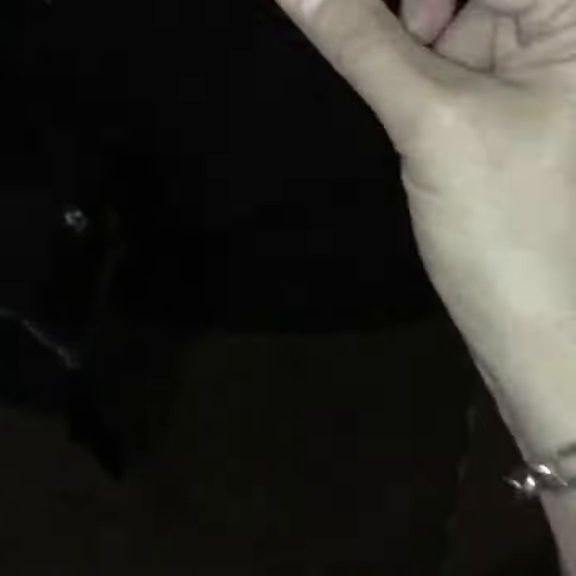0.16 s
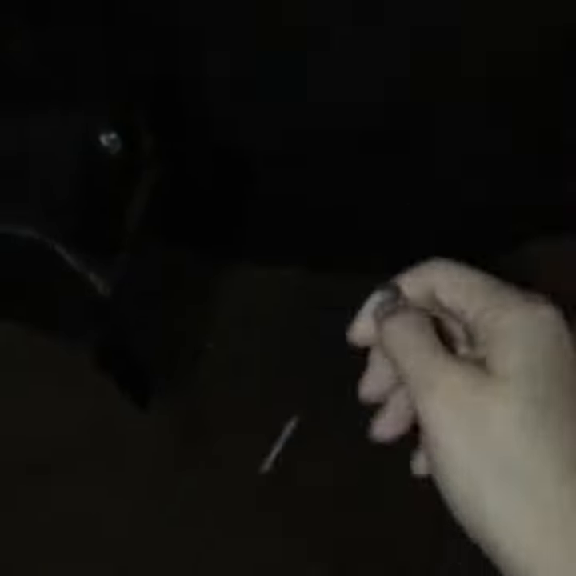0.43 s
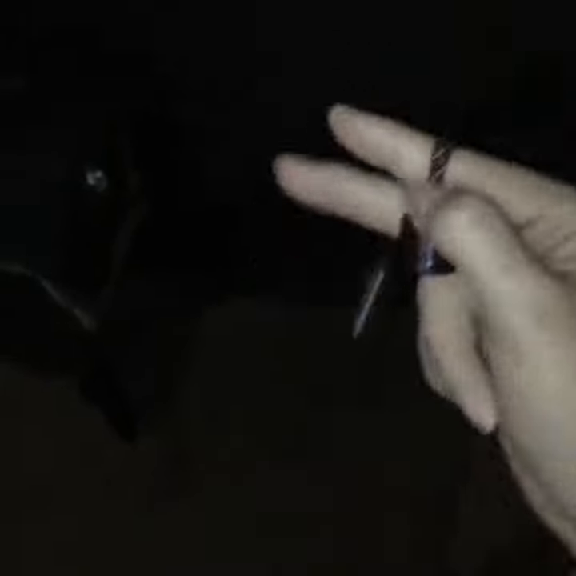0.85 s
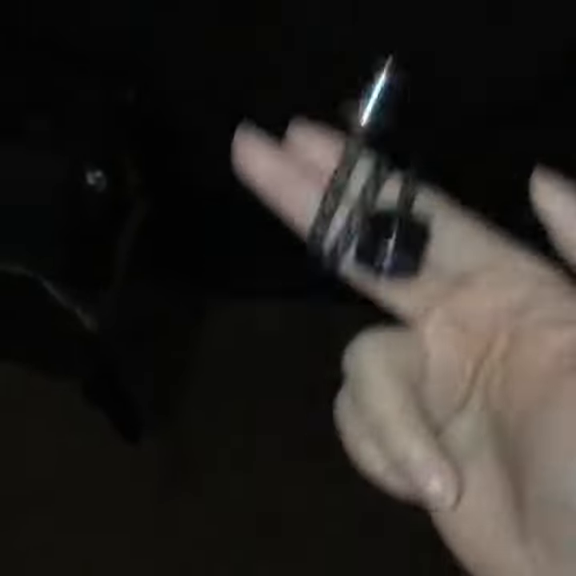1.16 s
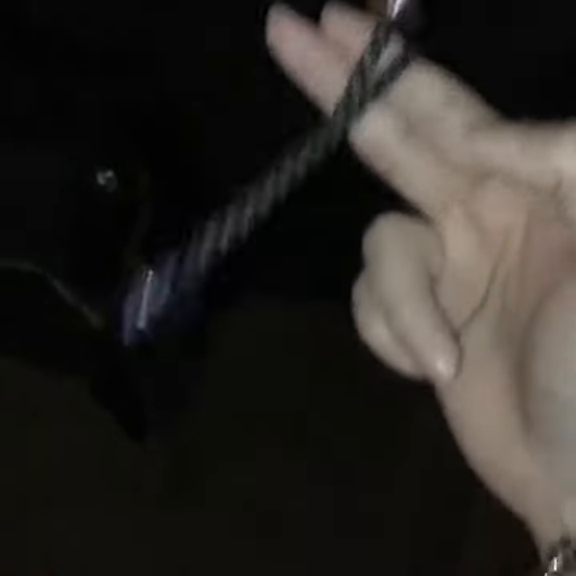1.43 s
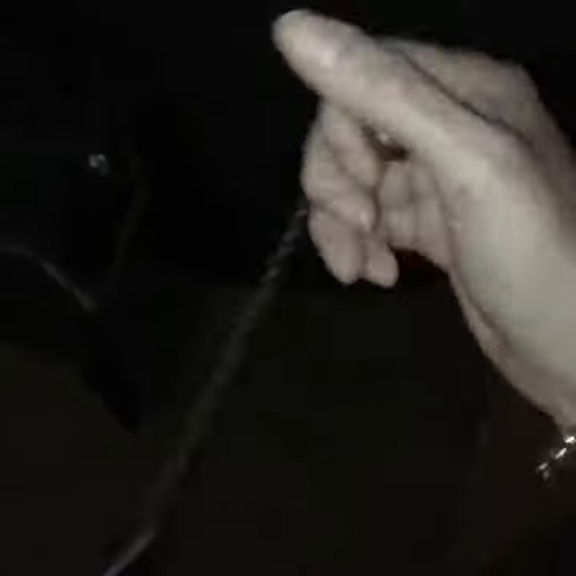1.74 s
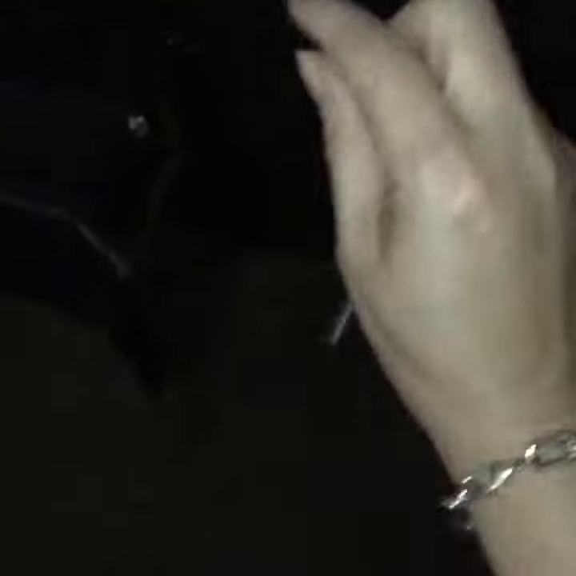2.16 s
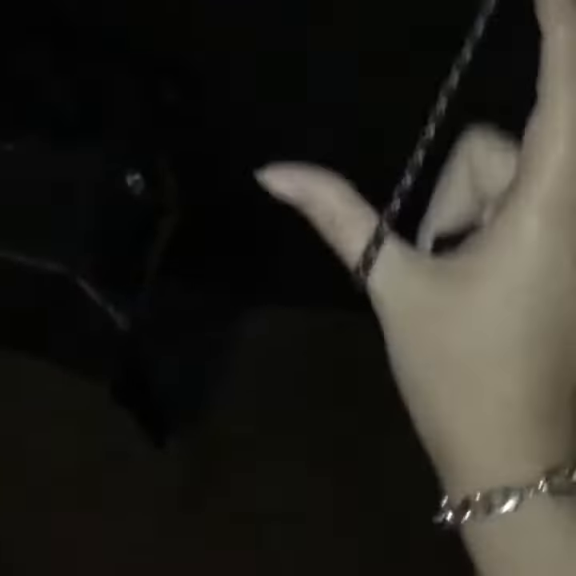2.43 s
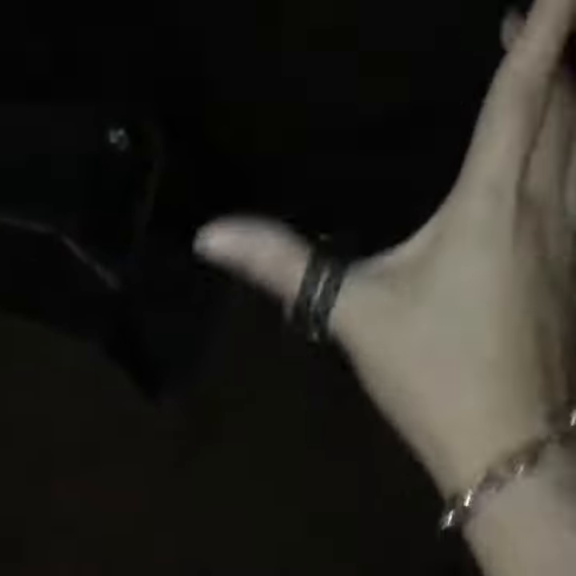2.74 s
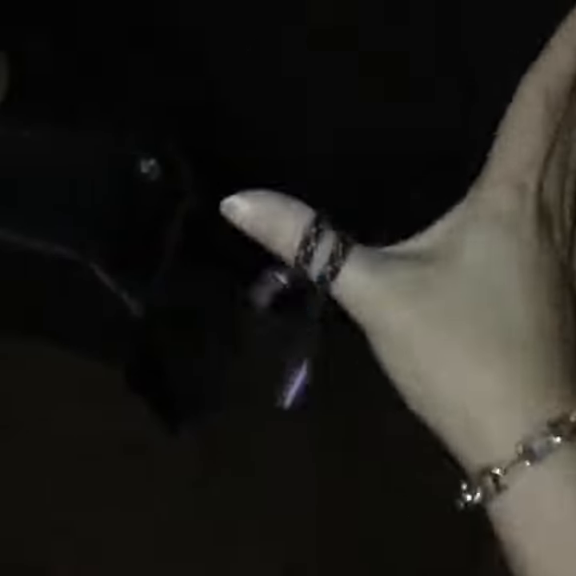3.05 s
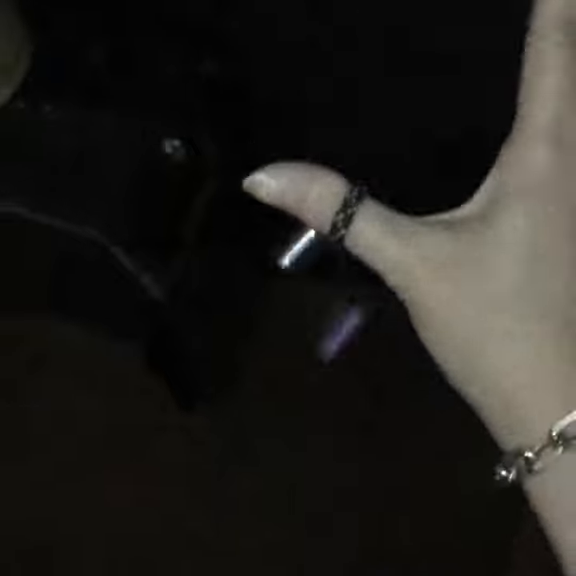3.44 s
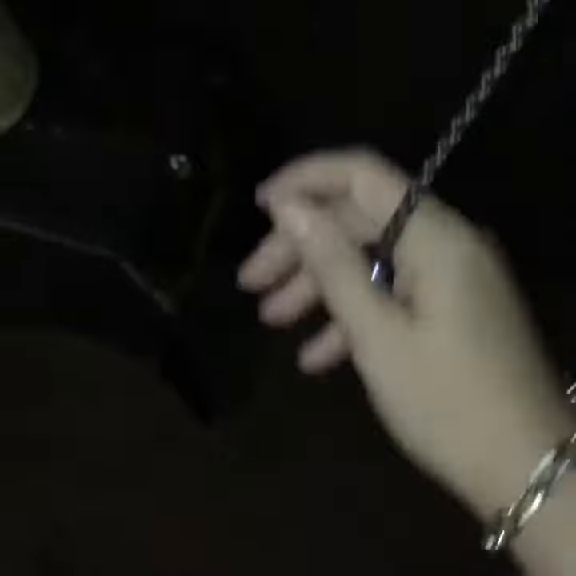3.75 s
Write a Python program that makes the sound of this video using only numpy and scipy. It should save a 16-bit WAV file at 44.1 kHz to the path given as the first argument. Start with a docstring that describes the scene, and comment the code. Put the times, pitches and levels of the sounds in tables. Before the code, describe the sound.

Close up in a small room, beads on a cord click thinly around a hand, with one hard clack early on. Faint cord swishes and wrist chain tinkles continue between ticks, over a fan's steady rush, hum and whine.

```python
"""Beads swung on a cord

Two weighted beads on a cord swing round the fingers, close by, in a small room. The cord
brushes over the skin and zips faintly as it winds on, a wrist chain tinkling along. The beads
tick lightly as they are caught; once they meet squarely in a sharp clack.
Behind, a fan-like machine runs steadily: rushing air, motor hum and a thin whine."""
import sys
import numpy as np
from scipy import signal
from scipy.fft import rfft, irfft
from scipy.io import wavfile

SR = 44100
rng = np.random.default_rng(int(sys.argv[2]) if len(sys.argv) > 2 else 0)


def digitize_waveform(pressure):
    """Quantize a signal to 16-bit integers and store it at the path in sys.argv[1].

    Rows of a 2-D input are taken as channels; values are limited to [-1, 1].
    """
    field = np.atleast_2d(pressure).T
    bounded = np.clip(field, -1, 1)
    quanta = np.round(bounded * 32767).astype(np.int16)
    wavfile.write(sys.argv[1], SR, quanta)


N = 171549
T = np.arange(N) / SR
HZ = np.maximum(np.arange(N // 2 + 1) * SR / N, 1)


def from_db(db):
    """Decibels to gain."""
    return 10 ** (np.asarray(db) / 20)


def unit_rms(x):
    """Scale to unit power."""
    return x / np.sqrt(np.mean(x ** 2) + 1e-20)


def cut(x, hz, kind, order=2):
    """Butterworth filter."""
    return signal.sosfilt(signal.butter(order, np.clip(hz, 10, .45 * SR), kind, fs=SR, output="sos"), x)


def drift(rate_hz):
    """Smooth random wander, unit RMS."""
    pole = np.exp(-80 * np.pi * rate_hz / SR)
    slow = signal.lfilter([1], [1, -2 * pole, pole * pole], rng.standard_normal(N // 40 + 2002))[2000:]
    return np.interp(np.arange(N) / 40, np.arange(len(slow)), unit_rms(slow))


def spectrum_db(points):
    """Levels interpolated over log frequency."""
    hz, db = np.transpose(points)
    return np.interp(np.log(HZ), np.log(hz), db)


def impulses(hits):
    """One click per (time [s], level [dB])."""
    clicks = np.zeros(N)
    for s, db in hits:
        clicks[int(s * SR)] += from_db(db)
    return clicks


def strike(hits, modes, low_hz, order=2):
    """Each hit rings the same heavily damped modes; little radiates below low_hz."""
    t = T[:SR // 50]
    ring = sum((-1) ** k * from_db(db - 60 * t / t60_s) * np.sin(2 * np.pi * hz * t)
               for k, (hz, db, t60_s) in enumerate(modes))
    ring = cut(ring, low_hz, "high", order)
    return signal.oaconvolve(impulses(hits), ring / np.abs(ring).max())[:N]


# Air rush: (frequency [Hz], density [dB/Hz])
AIR_SPECTRUM = [(25, -117), (43, -109), (56, -91.5), (72, -91.5), (90, -83), (120, -84.5), (155, -73),
                (210, -74), (300, -70), (400, -75.5), (520, -79.5), (690, -79), (750, -85.5), (1000, -86),
                (1350, -89.5), (2000, -90.5), (2250, -88), (2450, -93.5), (2650, -109), (3100, -112),
                (3500, -131), (4500, -133), (7000, -137), (10000, -136), (16000, -144)]
# Housing and room resonances: (centre [Hz], width [Hz], lift [dB])
AIR_RESONANCES = [(92.6, 2.7, 7.5), (244.2, 15, 5), (275, 16, 6), (334, 6.9, 6), (485, 5.7, 6.5),
                  (687, 5.2, 2.5), (2132, 79, 9.5), (2891, 81, 13.5), (4560, 240, 12), (9550, 300, 5)]
# Low rumble: (time [s], gain [dB])
RUMBLE_GAIN = [(0, 0.5), (.7, 1), (1.05, -0.5), (1.5, -0.5), (1.72, 3), (1.88, 4.5), (2.05, 0.5), (2.7, -1),
               (3.1, 1), (3.3, 1), (3.89, 0)]
# Flickering bands: (edge [Hz])
FLICKER_EDGES_HZ = [2020, 2450, 2960, 3540, 3770, 4200, 4750, 5340, 5800, 6000, 7000, 7835]


def fan_air(rumble_top_hz=426.5, flicker_rate_hz=23):
    """Air rushes through fixed resonances; the rumble swells a little and the treble flickers."""
    density_db = spectrum_db(AIR_SPECTRUM)
    for centre_hz, width_hz, lift_db in AIR_RESONANCES:
        density_db += lift_db * np.exp(-2 * ((HZ - centre_hz) / width_hz) ** 2 * np.log(2))
    air = rfft(rng.standard_normal(N)) * from_db(density_db) * np.sqrt(SR / 2)
    low_share = 1 / (1 + (HZ / rumble_top_hz) ** 6)
    rumble = irfft(air * low_share, N) * from_db(np.interp(T, *np.transpose(RUMBLE_GAIN)))
    out = rumble + irfft(air * (1 - low_share), N)
    depths_db = np.linspace(2.26, 8.5, len(FLICKER_EDGES_HZ) - 1)
    for low_hz, high_hz, depth_db in zip(FLICKER_EDGES_HZ, FLICKER_EDGES_HZ[1:], depths_db):
        band = irfft(air * (HZ >= low_hz) * (HZ < high_hz), N)
        out += band * (from_db(depth_db * drift(flicker_rate_hz)) - 1)
    return out


# Motor tones: (frequency [Hz], RMS level [dB])
HUM_TONES = [(91, -72.5), (162.5, -54.5), (274.5, -57), (323, -59), (823.6, -74), (1012, -74.5),
             (1155, -74), (1340, -82.5), (1637, -77.5), (2315, -73.5)]


def motor_hum(waver_hz=1.5, waver_db=3.5, rate_hz=3.49):
    """The motor's tones, each wavering in pitch and level."""
    out = np.zeros(N)
    for hz, db in HUM_TONES:
        phase = 2 * np.pi * np.cumsum(hz + waver_hz * drift(rate_hz)) / SR
        out += np.sqrt(2) * from_db(db + waver_db * drift(rate_hz)) * np.sin(phase)
    return out


def fan_whine(pitch_hz=2130, wander_hz=11, jitter_hz=7, level_db=-61.5, flutter_db=3):
    """A thin tone that wanders in pitch and flutters."""
    hz = pitch_hz + wander_hz * drift(rate_hz=3) + jitter_hz * drift(rate_hz=12)
    amplitude = np.sqrt(2) * from_db(level_db + flutter_db * drift(rate_hz=12))
    return amplitude * np.sin(2 * np.pi * np.cumsum(hz) / SR)


def wrist_chain(links=14, touches_per_s=240, spread_db=2.5, t60_s=.014, low_hz=9000, high_hz=15500):
    """Tiny links touch at random, each ringing briefly at its own pitch; unit RMS."""
    strengths = from_db(spread_db * np.minimum(rng.exponential(1, N), 4))
    touches = strengths * (rng.random(N) < touches_per_s / SR)
    touched_link = rng.integers(0, links, N)
    pitches_hz = np.geomspace(low_hz, high_hz, links) * rng.uniform(.98, 1.02, links)
    pole = from_db(-60 / (t60_s * SR))
    out = np.zeros(N)
    for link, angle in enumerate(2 * np.pi * pitches_hz / SR):
        drive = touches * (touched_link == link) + 1e-18
        out += signal.lfilter([0, np.sin(angle)], [1, -2 * pole * np.cos(angle), pole * pole], drive)
    return unit_rms(out)


def fibre_grain(catches_per_s=5400, spread_db=.5, hiss_gain=.34, top_hz=15000):
    """Cord fibres catch and let go: fine bright clicks over a smooth hiss."""
    strengths = from_db(spread_db * np.minimum(rng.exponential(1, N), 5)) * rng.choice([-1, 1], N)
    catches = unit_rms(strengths * (rng.random(N) < catches_per_s / SR))
    return cut(catches + hiss_gain * rng.standard_normal(N), top_hz, "low")


def swell(peak_s, rise_s, fade_s):
    """Gaussian envelope with separate rise and fade widths."""
    width_s = np.where(T < peak_s, rise_s, fade_s)
    return np.exp(-.5 * np.minimum(((T - peak_s) / width_s) ** 2, 100))


# Cord winding on: (peak time [s], half length [s], level [dB], centre [Hz])
ZIPS = [(0.092, 0.081, -89.5, 5340), (1.228, 0.039, -76, 5360), (2.118, 0.0096, -74.5, 6230)]


def cord_zips(grain, width_hz=400):
    """The taut braid zips faintly in a narrow band as it winds on."""
    out = np.zeros(N)
    for peak_s, half_s, db, hz in ZIPS:
        band = cut(grain, [hz - width_hz / 2, hz + width_hz / 2], "band")
        out += from_db(db) * swell(peak_s, half_s, half_s) * unit_rms(band)
    return out


# Cord sliding: (peak time [s], rise [s], fade [s], level [dB], low edge [Hz])
SLIDES = [(.247, 0.013, 0.012, -79, 10700), (.308, 0.0074, 0.0076, -81.5, 6000),
          (.355, .012, 0.016, -83.5, 6000), (.555, 0.05, 0.014, -90.5, 9750),
          (.696, 0.0034, 0.011, -80, 10100), (.729, 0.0072, 0.0049, -66.5, 9100),
          (1.119, 0.0089, 0.008, -61, 5000), (1.18, 0.055, 0.058, -78.5, 8420),
          (1.445, 0.0044, 0.0056, -72, 11010), (1.543, 0.0082, .012, -80, 4000),
          (1.611, 0.0057, 0.0052, -82, 7000), (1.704, 0.01, 0.011, -73.5, 11320),
          (1.742, .012, 0.015, -75.5, 9100), (1.82, 0.026, 0.011, -68, 8900),
          (1.859, 0.0053, .008, -77, 6500), (1.925, 0.013, 0.021, -67, 8500),
          (2.07, 0.0077, 0.015, -77, 8740), (2.116, 0.019, 0.0062, -75.5, 6000),
          (2.288, 0.019, 0.012, -68.5, 10560), (2.381, 0.039, 0.022, -87, 10040),
          (2.698, 0.0057, 0.0091, -72.5, 10580), (2.724, 0.0073, 0.0088, -68.5, 8900),
          (2.818, 0.012, .005, -60, 5624), (2.954, 0.015, 0.01, -63, 9350),
          (3.019, 0.012, 0.015, -81.5, 10000), (3.074, .004, 0.0045, -80.5, 9000),
          (3.373, .008, 0.0077, -76.5, 9700), (3.496, 0.032, 0.016, -83, 9000),
          (3.58, 0.024, 0.015, -74, 10700), (3.722, 0.0079, 0.033, -83, 9800),
          (3.796, 0.0062, 0.0065, -80, 7000), (3.877, .014, 0.017, -64, 10900)]


def cord_slides(grain):
    """The cord brushes over the fingers in short, bright swells."""
    return sum(from_db(db) * swell(peak_s, rise_s, fade_s) * unit_rms(cut(grain, low_hz, "high", 8))
               for peak_s, rise_s, fade_s, db, low_hz in SLIDES)


# Light bead touches: (time [s], peak [dB], low edge [Hz])
TICKS = [(.2465, -61.5, 10100), (.6941, -63, 10000), (.7277, -44.5, 9500), (.7318, -60, 9000),
         (1.1102, -44, 4980), (1.1173, -33.5, 2800), (1.1265, -43.5, 6040), (1.1555, -57.5, 5060),
         (1.3624, -47, 5500), (1.3652, -48, 5500), (1.3865, -48, 4460), (1.4457, -52.5, 7000),
         (1.4911, -64, 8000), (1.7385, -50, 9600), (1.8583, -63.5, 6060), (2.067, -48, 10040),
         (2.0894, -60, 6440), (2.7253, -57, 9000), (2.7285, -47.5, 9000), (2.8024, -48, 5530),
         (2.8064, -46.5, 7500), (2.8153, -32.5, 3400), (2.942, -47.5, 8400), (2.9449, -51.5, 9000),
         (2.9552, -48, 9500), (2.9617, -44.5, 8480), (2.9652, -40.5, 9000), (3.0300, -62.5, 8500),
         (3.5796, -52, 10000)]
# Modes of a light touch: (frequency [Hz], relative level [dB], T60 [s])
TICK_MODES = [(3150, -26, .004), (6100, -7.5, 0.0017), (8200, -6, 0.0026), (10800, 0.5, 0.0007),
              (13300, -1.5, 0.0014), (15300, -6.5, 0.0013)]


def bead_ticks():
    """The beads touch lightly; the more glancing the contact, the thinner the tick."""
    return sum(strike([(s, db)], TICK_MODES, low_hz, order=4) for s, db, low_hz in TICKS)


# Room modes: (frequency [Hz], level re diffuse tail [dB])
ROOM_MODES = [(4990, -26), (5771, -22), (6853, -23.5), (8285, -22)]


def room(x, tail_t60_s=.28, early_t60_s=.19, early_db=7.5, ring_t60_s=.33, gap_s=.0021, clump_db=.5):
    """Slightly clumped early reflections give way to a short diffuse tail with a faint ring."""
    t = T[:SR // 2]
    decay = np.hypot(from_db(-60 * t / tail_t60_s), from_db(early_db - 60 * t / early_t60_s))
    diffuse = rng.standard_normal(len(t)) * decay * from_db(-clump_db * drift(rate_hz=790)[:len(t)])
    ring = sum(from_db(db - 60 * t / ring_t60_s) * np.sin(2 * np.pi * hz * t) for hz, db in ROOM_MODES)
    response = unit_rms((diffuse + ring) * (t > gap_s)) / np.sqrt(len(t))
    return signal.fftconvolve(x, response)[:N]


# Square bead hit: (time [s], direct peak [dB])
CLACKS = [(1.2943, -8.5)]
# Modes of the hard contact: (frequency [Hz], relative level [dB], T60 [s])
CLACK_MODES = [(1400, -38, .005), (2364.5, -32.5, 0.0024), (4900, -14, 0.0012), (6700, -4, .0012),
               (8600, -7, 0.001), (11200, 1, 0.00098), (13150, -2.5, 0.0012), (14240, -21, 0.0049)]
# Echoes off nearby surfaces: (delay [s], gain [dB], low edge [Hz], high edge [Hz])
CLACK_ECHOES = [(.0008, -4.5, 12600, 15140), (.0025, 1, 6300, 10000)]
# Colour of the clack's room tail: (frequency [Hz], gain [dB])
CLACK_TAIL_COLOUR = [(1000, -17.5), (2500, -4.5), (3600, -8), (5000, -1.5), (6700, -3), (8500, -1),
                     (11500, -7), (14500, -10.5), (16000, -18)]


def bead_clack(low_hz=1100):
    """Bead hits bead, with near echoes and room tail; so small a bead radiates little below low_hz."""
    direct = strike(CLACKS, CLACK_MODES, low_hz)
    echoes = sum(cut(impulses([(s + delay_s, db + gain_db) for s, db in CLACKS]), band_hz, "band")
                 for delay_s, gain_db, *band_hz in CLACK_ECHOES)
    tail = room(impulses(CLACKS))
    tail = irfft(rfft(tail) * from_db(spectrum_db(CLACK_TAIL_COLOUR)), N)
    return direct + echoes + cut(tail, low_hz, "high", order=1)


def scene(chain_db=-8.5, hand_room_db=-14):
    """Beads, cord and chain close by, the fan behind; mono."""
    fan = fan_air() + motor_hum() + fan_whine()
    grain = from_db(chain_db) * wrist_chain() + fibre_grain()  # the chain swells with the cord
    hand = cord_zips(grain) + cord_slides(grain) + bead_ticks()
    return (fan + hand + from_db(hand_room_db) * room(hand) + bead_clack())[None]


def record(dry, cutoff_hz=15800):
    """Steep elliptic low-pass."""
    return signal.sosfilt(signal.ellip(10, .1, 80, cutoff_hz, fs=SR, output="sos"), dry)


dry = scene()
out = record(dry)
digitize_waveform(out)
```